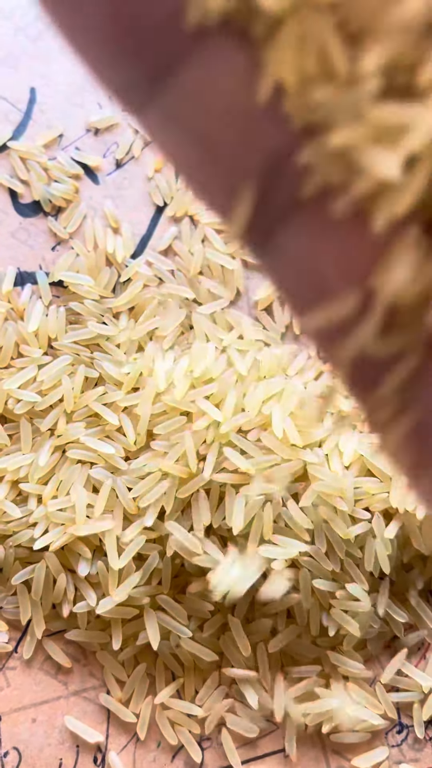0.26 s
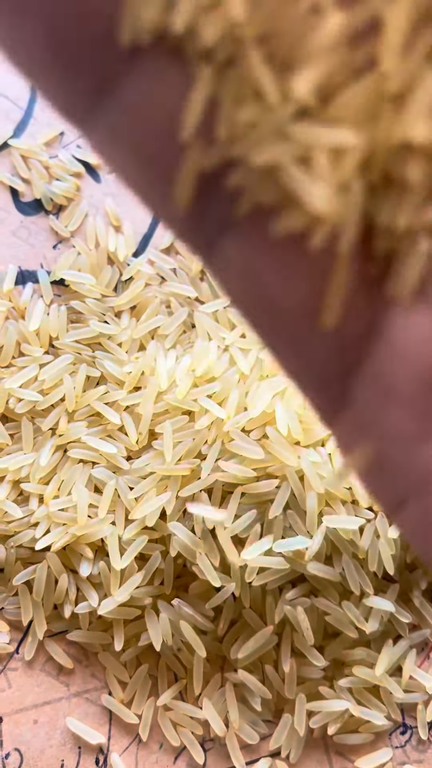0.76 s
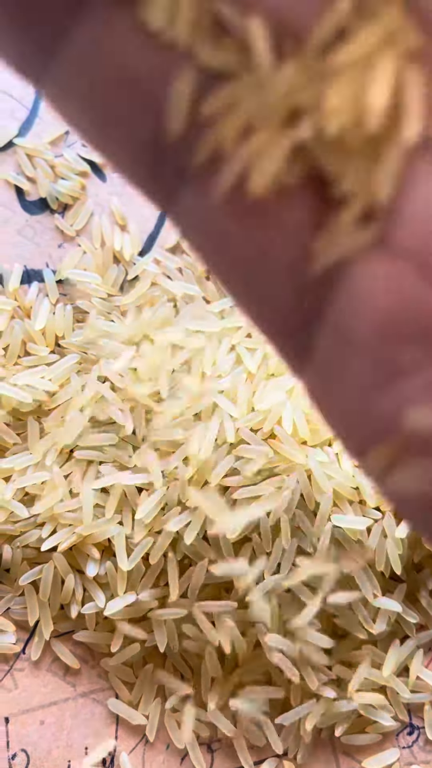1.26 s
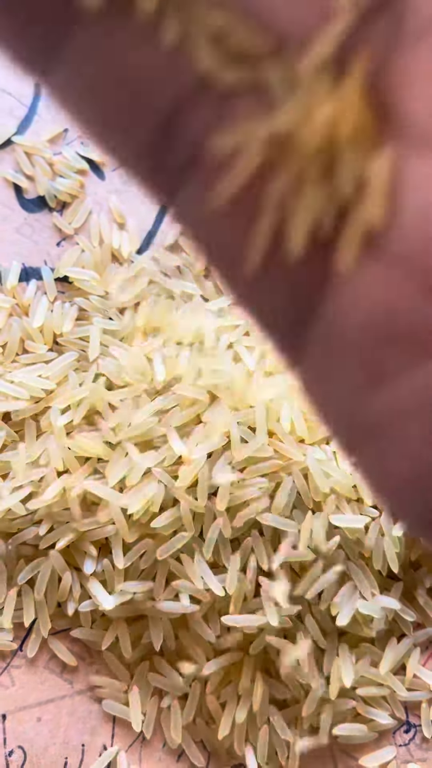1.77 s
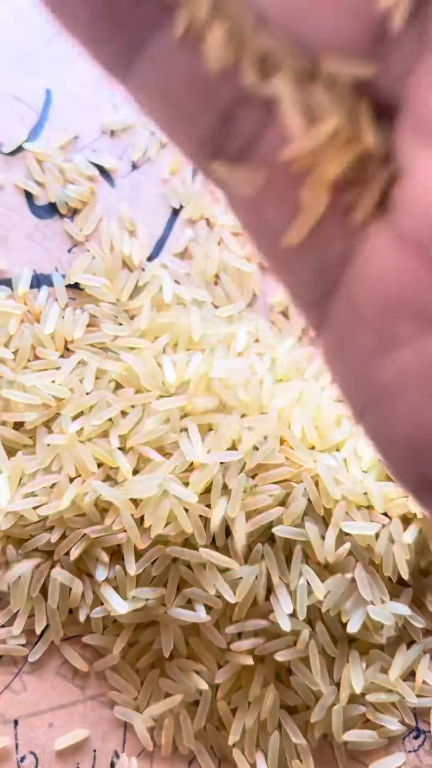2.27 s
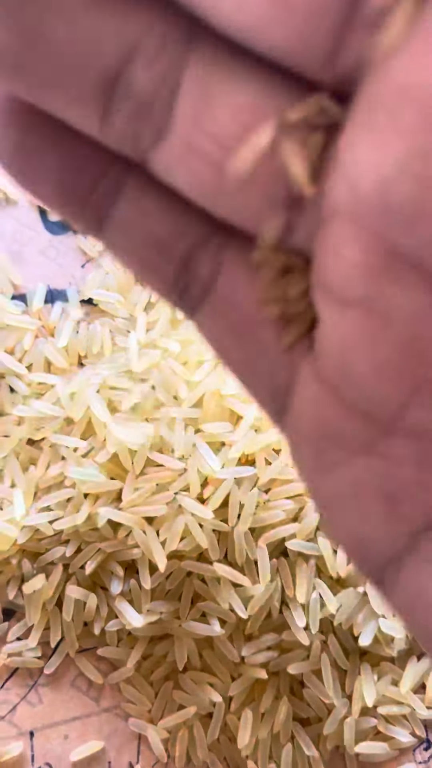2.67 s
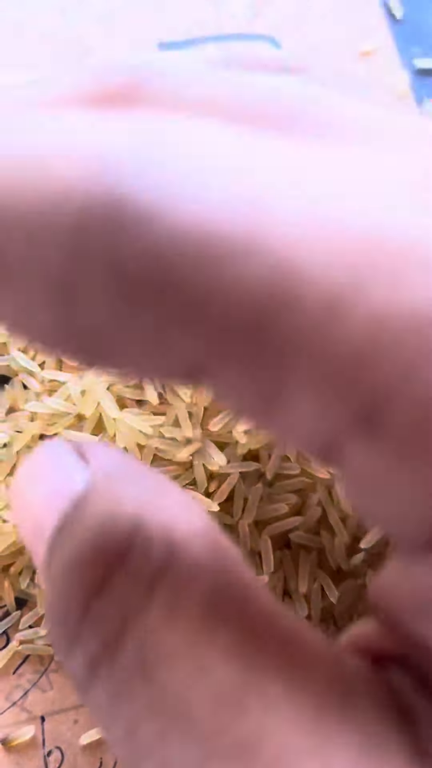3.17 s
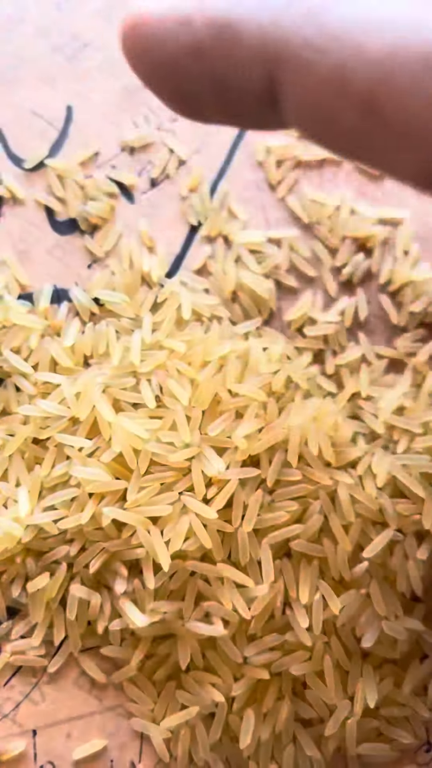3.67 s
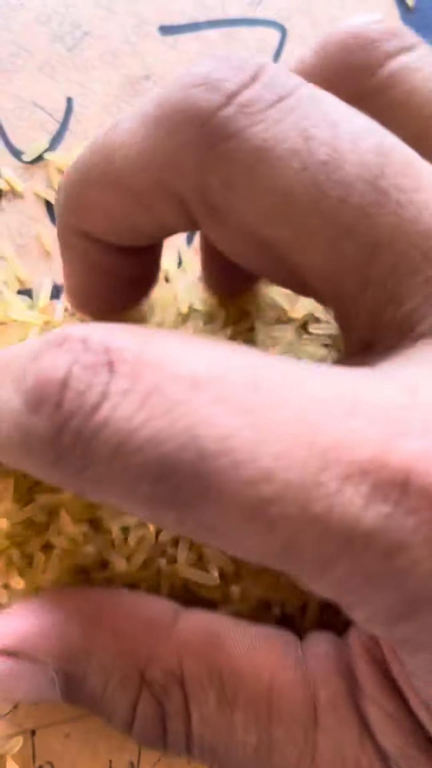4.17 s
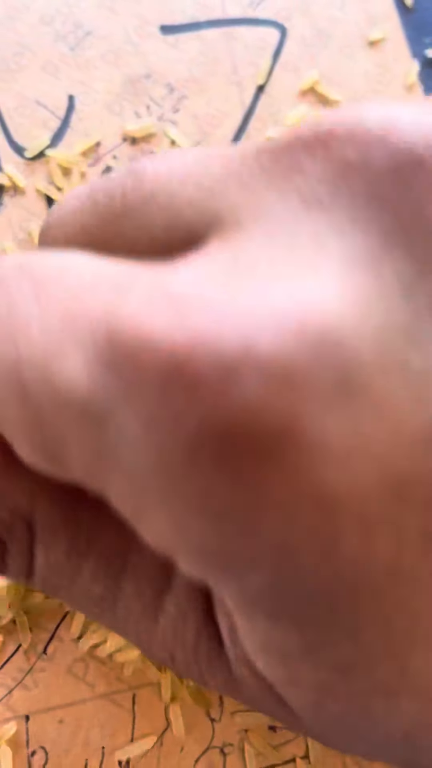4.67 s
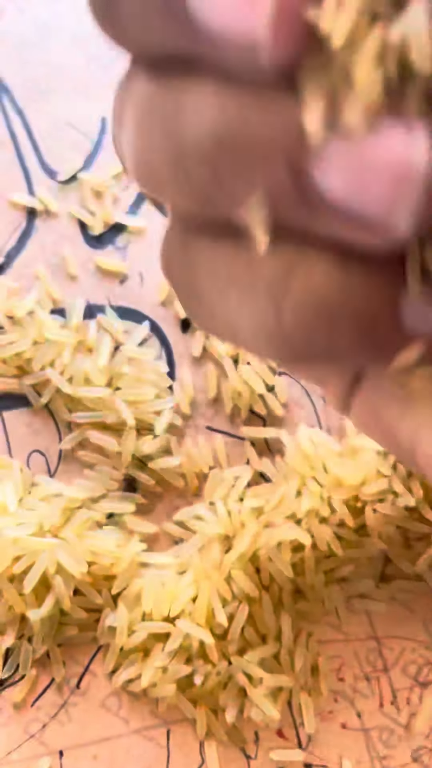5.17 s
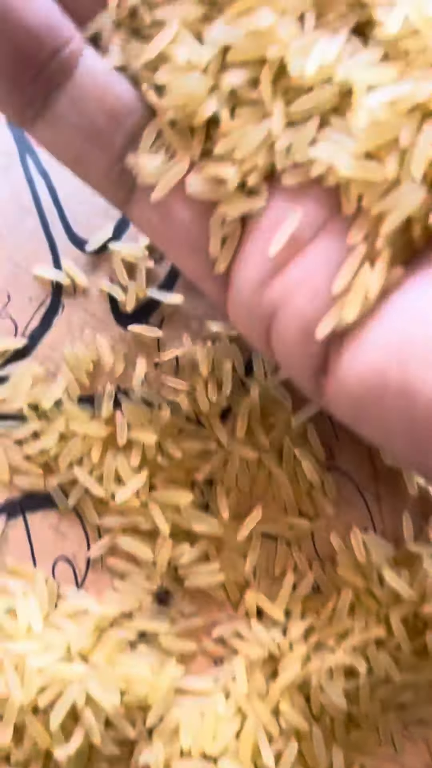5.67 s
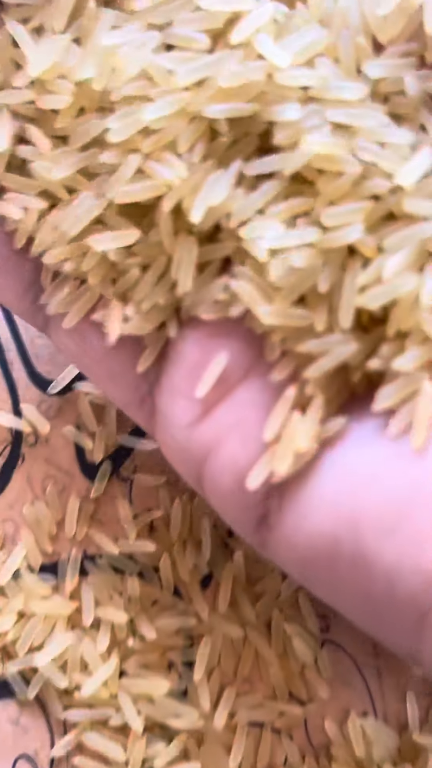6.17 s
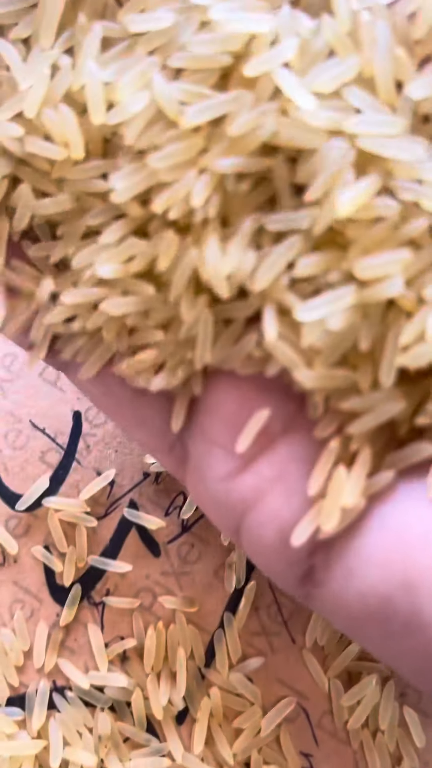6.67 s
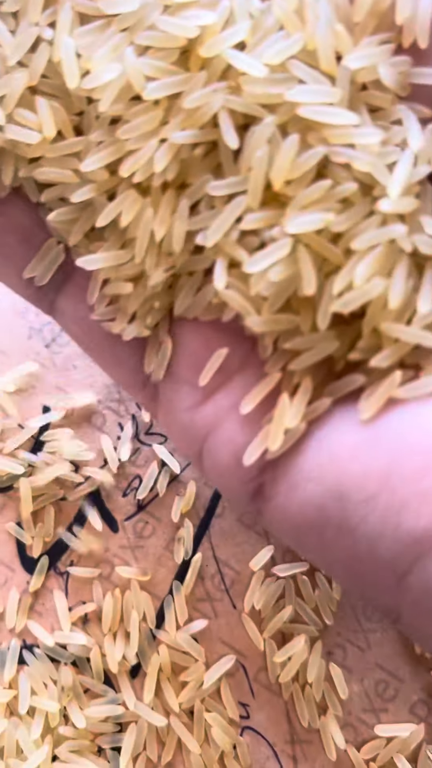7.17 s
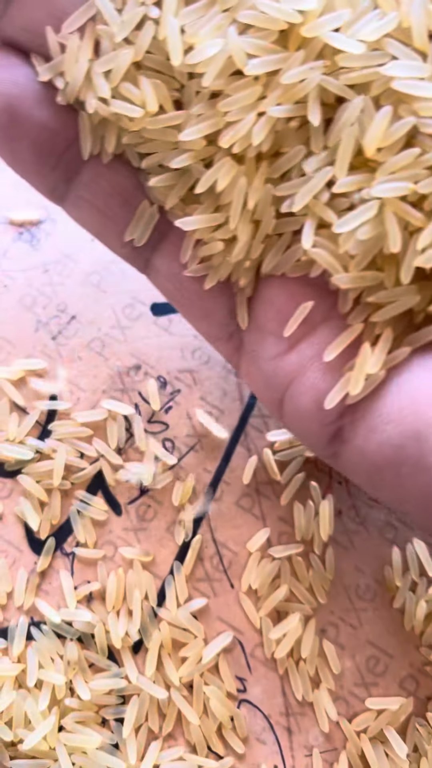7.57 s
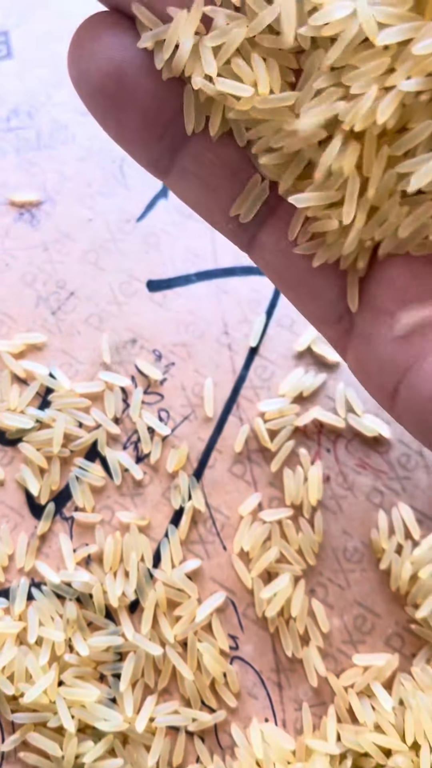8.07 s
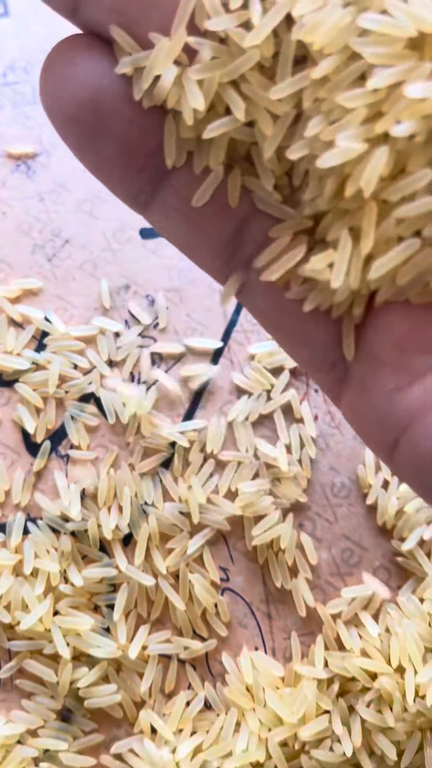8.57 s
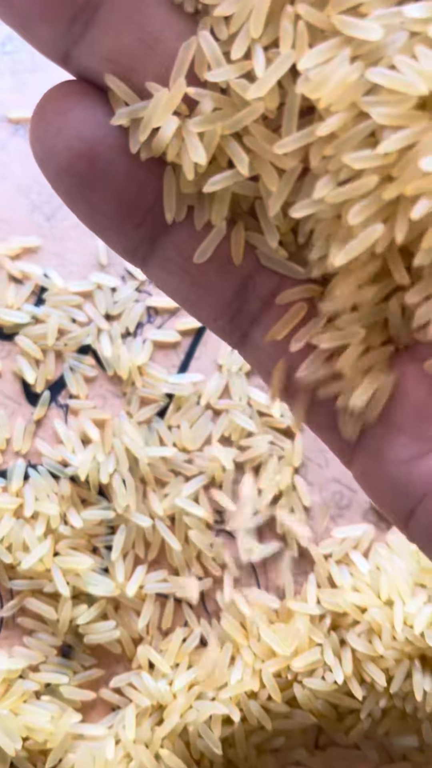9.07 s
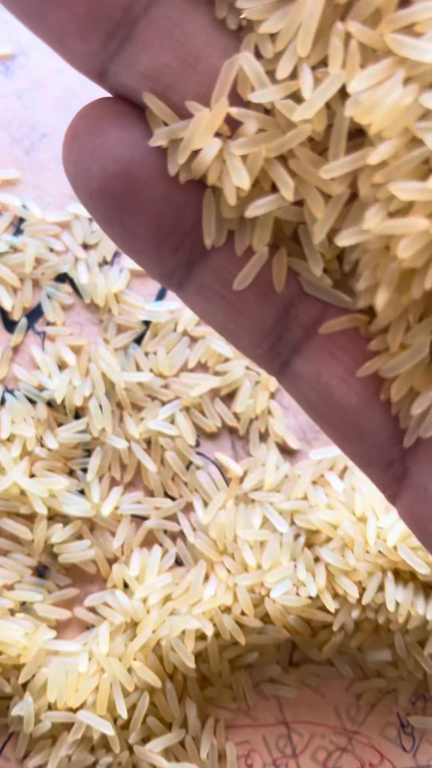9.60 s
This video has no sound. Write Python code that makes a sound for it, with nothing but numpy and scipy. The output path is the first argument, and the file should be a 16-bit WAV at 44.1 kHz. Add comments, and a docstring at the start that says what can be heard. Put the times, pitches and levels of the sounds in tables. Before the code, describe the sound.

Very close to the microphone, dry rice falls from a hand onto a heap on a thin board: sharp bright ticks with small dull knocks. The trickle thins, a hand scrapes the heap together in a dense gritty rush, then grains drop again in uneven bursts. Faint low engine throb and rumble lie behind, with a distant bird near the end.

```python
"""A thin board close to a two-port microphone: dry rice trickles from a hand onto a heap.
Each grain is a noise burst pair, a bright tick and a board knock; slides are showers of small ones.
Midway the hand scrapes the heap together: dense ticks, cupped knocks and a low band of drag noise.
Behind: two idling engines built from firing orders, one coming nearer, low rumble of noise and hums,
faint coloured air noise and a far bird of gliding whistles."""
import sys
import numpy as np
from scipy import signal
from scipy.fft import rfft, irfft, next_fast_len
from scipy.io import wavfile
from scipy.ndimage import uniform_filter1d

SR = 44100
rng = np.random.default_rng(int(sys.argv[2]) if len(sys.argv) > 2 else 0)


def generate_wav(signal):
    """Clip the signal to [-1, 1] and save it as 16-bit WAV at the path in sys.argv[1]."""
    frames = np.transpose(np.atleast_2d(signal))
    scaled = np.clip(frames, -1, 1) * 32767
    pcm = np.round(scaled).astype(np.int16)
    wavfile.write(sys.argv[1], SR, pcm)


N = 433944
TIME = np.arange(N) / SR
LEAD = 48  # samples an impact sound holds before its moment of contact
IN_STEP = [(0, 0), (1, 0)]  # no lag between the ports: (frequency [Hz], lag [rad])


def gain_of(db):
    """Decibels to an amplitude factor."""
    return 10 ** (np.asarray(db) / 20)


def evened(x):
    """Scales to rms 1."""
    return x / np.sqrt(np.mean(x ** 2) + 1e-20)


def wander(smooth):
    """A random curve of rms 1, smoothed over the given number of samples."""
    return evened(uniform_filter1d(rng.standard_normal(N), size=smooth))


def read(points, hz):
    """A spectrum table at the given frequencies, interpolated along log frequency."""
    f, value = np.transpose(points)
    return np.interp(np.log(hz + 1), np.log(f + 1), value)


def colour_gain(colour, size):
    """The factor of a colour table at every bin of a spectrum."""
    return gain_of(read(colour, np.fft.rfftfreq(size, 1 / SR)))


def played(rows):
    """Every column of a curve table at every sample."""
    s, *columns = np.transpose(rows)
    return [np.interp(TIME, s, column) for column in columns]


# right port over left: (frequency [Hz], level [dB])
RIGHT_LOUDER = [(150, 0), (300, 1.5), (900, 1.3), (1700, 0), (2900, 3), (3600, 0)]


def ports(a, b, alike, lag, size):
    """Two spectra become a left and a right port: the right is partly alike, late and a little louder."""
    hz = np.fft.rfftfreq(size, 1 / SR)
    same = np.clip(read(alike, hz), -1, 1)
    mixed = same * a + np.sqrt(1 - same ** 2) * b
    right = mixed * np.exp(-1j * np.interp(hz, *np.transpose(lag)))
    return irfft(np.array([a, right * colour_gain(RIGHT_LOUDER, size)]), size)


def noise(colour, alike, lag):
    """Steady coloured noise at both ports, rms 1."""
    size = next_fast_len(N)
    a, b = rfft(rng.standard_normal((2, size))) * colour_gain(colour, size)
    return evened(ports(a, b, alike, lag, size)[:, :N])


def fuzzy(hz, width):
    """Noise of rms 1 in a narrow resonance that follows hz; two equal poles, each width Hz wide."""
    pole = np.exp(-np.pi * width / SR)
    slow = [1, 1j] @ rng.standard_normal((2, N))
    for _ in range(2):
        slow = signal.lfilter([1], [1, -pole], slow)
    carrier = np.exp(2j * np.pi * np.cumsum(hz * np.ones(N)) / SR)
    return evened((slow * carrier).real)


def nook(x, t60):
    """A short, dull diffuse tail from the surfaces nearby."""
    t = np.arange(SR // 3) / SR
    dull = uniform_filter1d(rng.standard_normal(len(t)), size=3)
    tail = dull * gain_of(-60 * t / t60) * (t > .003)
    return signal.oaconvolve(x, tail[None] / np.linalg.norm(tail), axes=1)[:, :N]


# nearer engine, its firing cycle: (time [s], frequency [Hz])
CYCLE = [(0, 30.12), (4.8, 29.81), (7, 30.07), (9.84, 29.44)]
# its 2nd order, the deep throb: (time [s], level [dB])
THROB = [(0, -49), (.41, -45.5), (1.23, -48.5), (1.64, -55), (2.6, -42.5), (3.5, -51.5), (4.1, -48.5),
         (4.92, -40.5), (5.74, -47.5), (6.15, -40.5), (6.56, -44.5), (7.381, -43.5), (7.9, -51.5),
         (9.1, -40.5), (9.5, -47), (9.84, -49)]
# its 3rd order: (time [s], level [dB])
THIRD = [(0, -70), (1.2, -81), (3.7, -55), (4.3, -51), (5.1, -58), (5.74, -58), (6.2, -54), (7, -57),
         (7.8, -44.5), (8.5, -49), (9.2, -47.5), (9.84, -48)]
# its 5th order, rising as it comes nearer: (time [s], level [dB])
NEARING = [(0, -73), (1.6, -62.5), (3, -61), (5, -57), (7.4, -52.5), (9.1, -47.5), (9.84, -48)]
# its wavering upper orders: (multiple of the cycle, level relative to the 5th order [dB])
UPPER_ORDERS = [(6, -0.5), (7, -4.5), (11, -15)]
# far engine: (time [s], firing cycle [Hz], level [dB])
FAR_ENGINE = [(0, 28.49, -58.5), (2.5, 28.84, -54), (5, 28.7, -52), (6.5, 28.13, -55.5), (8, 27.63, -53),
              (9.84, 27.3, -46.5)]
# its orders: (multiple of the cycle, level relative to the far engine's curve [dB])
FAR_ORDERS = [(2, -1), (5, -1), (6, -12), (7, -12), (8, -14)]


def engines():
    """Orders are multiples of two firing cycles; the nearer one's upper and all far ones waver."""
    (hz,), (second_db,), (third_db,), (fifth_db,) = map(played, (CYCLE, THROB, THIRD, NEARING))
    turns = np.cumsum(hz) / SR
    near = np.zeros(N)
    for order, db in ((2, second_db), (3, third_db), (5, fifth_db)):
        near += gain_of(db) * np.sqrt(2) * np.sin(2 * np.pi * (order * turns + rng.random()))
    near += sum(gain_of(fifth_db + db) * fuzzy(order * hz, 2.2) for order, db in UPPER_ORDERS)
    far_hz, far_db = played(FAR_ENGINE)
    return near + sum(gain_of(far_db + db) * fuzzy(order * far_hz, 1.0) for order, db in FAR_ORDERS)


# swell of the low noise: (time [s], deep level [dB], upper level [dB])
RUMBLE = [(0, -49.5, -55), (2, -48.5, -56.5), (4, -56, -54.5), (6, -49, -51), (8, -51, -51.5),
          (9.84, -85, -50)]
# colour of the deep part: (frequency [Hz], relative level [dB])
DEEP = [(24, -4), (36, 2), (50, 19.5), (65, 24.5), (95, 7), (112, 11.5), (140, -54)]
# colour of the upper part: (frequency [Hz], relative level [dB])
UPPER = [(95, -5), (125, 5), (140, 10), (170, 1.5), (215, 5), (250, -6.5), (300, -74)]
# fuzzy steady hums: (frequency [Hz], width of each pole [Hz], level [dB])
DRONES = [(49.6, 9, -54), (94.1, 4.7, -56.5), (311, 6.7, -69.5)]


def rumble():
    """Low noise and steady hums from the surroundings, nearly alike at both ports."""
    deep_db, upper_db = played(RUMBLE)
    alike = [(60, .986), (150, .987), (300, .93)]  # (frequency [Hz], likeness [0-1])
    wash = gain_of(deep_db) * noise(DEEP, alike, IN_STEP)
    wash += gain_of(upper_db) * noise(UPPER, alike, IN_STEP)
    return wash + sum(gain_of(db) * fuzzy(hz, width) for hz, width, db in DRONES)


# colour of the air noise: (frequency [Hz], relative level [dB])
AIR = [(150, -4.5), (240, -0.5), (430, -7.5), (700, -14.5), (1200, -21), (1800, -27), (2250, -27),
       (2800, -31), (4500, -33), (7200, -35.5), (8400, -63), (9700, -58), (10800, -44), (12200, -68)]
# likeness of the ports for it: (frequency [Hz], likeness [-1 to 1])
AIR_ALIKE = [(200, 1), (350, 0.8), (700, 0.03), (1300, 0.22), (2400, 0.64), (4400, 0.094), (8000, 0.26)]
# its slow swell: (time [s], level [dB])
AIR_SWELL = [(0, -56), (2, -54), (3.7, -60), (6, -54.5), (8, -56), (9.84, -51)]


def air():
    """Faint coloured noise that swells slowly and wavers by about a decibel."""
    level_db = played(AIR_SWELL)[0] + 1.1 * wander(3000)
    return gain_of(level_db) * noise(AIR, AIR_ALIKE, IN_STEP)


# right port behind the left for near sound: (frequency [Hz], lag [rad])
NEAR_LAG = [(0, 0), (1800, 0), (2600, .3), (3100, .9), (4300, 1.1), (4850, 3.1), (5300, 5.4), (5900, 6.3),
            (9050, 9.4), (12200, 12.4), (13600, 13.3), (14500, 15), (15500, 15.6), (16600, 15.7)]
# likeness of the ports for near sound: (frequency [Hz], likeness [0-1])
NEAR_ALIKE = [(300, .9), (700, .8), (1700, .99), (2500, .93), (3500, .6), (5900, .93), (7100, .78),
              (9000, .97), (13000, .88), (14300, .55), (15700, .88)]
OWN_COLOUR_DB = 2  # no two impacts have quite the same colour


def strikes(colour, rise_ms, crack_ms, echo_ms, echo_db, tail_ms, tail_db, count=96, size=1024):
    """Many versions of one impact: a crack, its echo between board and housing, and a rattle."""
    def crack(ms):
        return np.exp(-np.maximum(ms / crack_ms, -ms / rise_ms))

    ms = (np.arange(size) - LEAD) / SR * 1000
    late = ms - echo_ms * rng.uniform(0.715, 1.33, (count, 1))
    echo = gain_of(echo_db + 0.71 * rng.standard_normal((count, 1))) * crack(late)
    rattle = gain_of(tail_db) * np.exp(-abs(ms) / tail_ms) * (ms > 0)
    shape = crack(ms) + echo + rattle
    own = uniform_filter1d(rng.standard_normal((count, size // 2 + 1)), size=28)
    own_gain = gain_of(OWN_COLOUR_DB * evened(own))
    cepstrum = irfft(np.log(colour_gain(colour, size) * own_gain))
    cepstrum[:, 1:size // 2] *= 2  # folding makes the colour causal
    cepstrum[:, size // 2 + 1:] = 0
    burst = rfft(shape * rng.standard_normal((2, count, size)))
    # every blow covers all pitches evenly before it is coloured
    flat = burst / np.sqrt(uniform_filter1d(abs(burst) ** 2, size=30))
    a, b = flat * np.exp(rfft(cepstrum))
    return ports(a, b, NEAR_ALIKE, NEAR_LAG, size).transpose(1, 0, 2)


# grain on grain, lifted by the microphone port's resonance: (frequency [Hz], relative level [dB])
TICK = [(1500, -23.5), (3000, -33), (4700, -11.5), (5400, -6), (6200, -5.5), (7000, -4.5), (8300, -3.5),
        (10300, 6), (11500, -2.5), (12600, -14), (14000, -21.5), (15600, -22), (16600, -50.5)]


def grain_ticks():
    """Hard grains meet in a very short, bright crack with little rattle."""
    return strikes(TICK, rise_ms=0.28, crack_ms=0.16, echo_ms=1.173, echo_db=-8, tail_ms=3.6, tail_db=-28)


# the board's colour: (frequency [Hz], relative level [dB])
KNOCK = [(250, -13.5), (600, -3), (1250, -4.5), (1680, 0), (2300, -5), (3100, -5), (3700, -10),
         (4300, -6.5), (7000, -38.5)]


def board_knocks():
    """The thin board answers a grain with a lower, slightly longer crack."""
    return strikes(KNOCK, rise_ms=0.26, crack_ms=0.26, echo_ms=1.35, echo_db=-7.5,
                   tail_ms=3.6, tail_db=-21.5)


def scatter(sounds, s, sizes):
    """Drops a random version of the impact at each moment."""
    length = sounds.shape[2]
    out = np.zeros((2, N + 2 * length))
    picks = (rng.random(len(s)) * len(sounds)).astype(int)
    for at, size, pick in zip((s * SR).astype(int), sizes, picks):
        out[:, at:at + length] += size * sounds[pick]
    return out[:, LEAD:N + LEAD]


# colour of the showers' ticks, falling off at the top: (frequency [Hz], relative level [dB])
SHOWER_COLOUR = [(3500, 20), (6200, 17.5), (9000, 14), (11500, 15.5), (13000, 13), (16000, -5)]


def shower(levels, span, ticks, knocks, per_s, spread_db, clump_db):
    """Chance impacts of uneven, bunched strength, at the given tick and knock levels."""
    chance, luck = rng.random(N), rng.exponential(1, N)
    smooth = uniform_filter1d(uniform_filter1d(rng.standard_normal(N), 200), 200)
    clumps = gain_of(clump_db * evened(smooth))
    inside = (TIME > span[0]) & (TIME < span[1])
    at = inside & (chance < per_s / SR)
    sizes = clumps[at] * gain_of(spread_db * np.minimum(luck[at], 3.5))
    size = ticks.shape[2]
    coloured = irfft(rfft(ticks) * colour_gain(SHOWER_COLOUR, size), size)
    out = np.zeros((2, N))
    for level, sounds in zip(levels, (coloured, knocks)):
        equal = sounds / np.linalg.norm(sounds, axis=(1, 2), keepdims=True)
        patter = scatter(equal, TIME[at], sizes)
        out += level * patter / np.std(patter.mean(0)[inside])
    return out


# little slides of small grains leaving the hand:
# (time [s], length [s], tick level [dB], knock level relative to the ticks [dB])
SLIDES = [(0.005, 0.13, -57, 0), (0.2, 0.03, -59.5, -0.5), (0.285, 0.15, -53.5, -5),
          (0.497, 0.15, -60.5, -1.5), (0.953, 0.11, -56.5, -3.5), (1.138, 0.076, -49.5, -3.5),
          (1.371, 0.36, -53, -3.5), (1.755, 0.069, -66, 1), (1.904, 0.089, -61.5, 2.5),
          (2.21, 0.11, -63.5, 0), (2.45, 0.018, -50, 0), (2.593, 0.12, -64.5, -0.5),
          (2.997, 0.09, -57.5, -3.5), (4.657, 0.054, -62.5, -8), (4.815, 0.13, -73.5, 7),
          (4.923, 0.39, -61, -2.5), (5.487, 0.06, -47, -1.5), (5.59, 0.06, -60, 3), (5.94, 0.13, -62, 0),
          (6.366, 0.1, -66.5, 2), (6.783, 0.012, -58, 0.5), (6.857, 0.03, -63, 9), (6.911, 0.038, -50.5, 2),
          (7.08, 0.051, -77, 13.5), (7.236, 0.066, -82, 12), (8.16, 0.041, -69, 2),
          (8.275, 0.017, -49.5, -1.5), (8.35, 0.063, -57, 4.5), (8.504, 0.11, -71, 5.5),
          (8.883, 0.055, -66.5, 10), (9.258, 0.066, -65, 6.5)]
SWELL_DB_PER_S, SETTLE_DB_PER_S = 420, 122  # how fast a slide comes and dies away
REST_TICKS_DB, REST_KNOCKS_DB = -88.5, -77.5  # the heap creeps faintly between slides


def slides(ticks, knocks):
    """A patter of small impacts in which each slide swells, holds and settles."""
    start, length, tick_db, knock_db = np.transpose(SLIDES)[:, :, None]
    t = np.arange(0, N + 64, 64) / SR
    before, after = np.maximum(start - t, 0), np.maximum(t - start - length, 0)
    away_db = SWELL_DB_PER_S * before + SETTLE_DB_PER_S * after
    levels = []
    for db, rest_db in ((tick_db, REST_TICKS_DB), (tick_db + knock_db, REST_KNOCKS_DB)):
        power = (gain_of(db - away_db) ** 2).sum(0) + gain_of(rest_db) ** 2
        levels.append(np.interp(TIME, t, np.sqrt(power)))
    return shower(levels, (0, N / SR), ticks, knocks, per_s=520, spread_db=2.0, clump_db=1.5)


# single grains landing: (time [s], tick peak level [dB], knock peak level relative to the tick [dB])
GRAINS = [(0.029, -38, -13), (0.038, -23, -21.0), (0.054, -23.5, -13.5), (0.098, -27.5, -9.5),
          (0.127, -26, -26.0), (0.1318, -26.5, -13), (0.1447, -36, -16), (0.1583, -28, -19),
          (0.212, -30.5, -12), (0.234, -30.5, -18), (0.272, -25.5, -10), (0.2943, -29, -21.0),
          (0.303, -27, -4), (0.3313, -25, -19), (0.3468, -24, -14), (0.419, -28.5, -30), (0.453, -31, -22),
          (0.534, -36, -19.0), (0.5576, -33, -21), (0.5767, -19.5, -18), (0.6, -45, -28),
          (0.6113, -30, -10), (0.6448, -30.5, -16), (0.654, -26.5, -20), (0.8394, -35.5, -15),
          (0.8954, -32, -12), (0.9175, -29.5, -13), (0.9324, -29, -11), (0.9773, -31.5, -8.5),
          (1.0174, -33.5, -5), (1.0461, -31, -6.5), (1.096, -25.5, -7), (1.113, -33, -19.0),
          (1.1253, -31, -18), (1.131, -26, -16), (1.279, -31.5, -9.5), (1.3164, -29.5, -9),
          (1.3663, -32, -5.5), (1.3744, -23.0, -24.0), (1.411, -32, -14), (1.431, -29.5, -14),
          (1.454, -34, -3), (1.5914, -33, -13), (1.6348, -26, -13), (1.6463, -31.5, -3), (1.6908, -31, -11),
          (1.6968, -18, -20), (1.7032, -22, -20), (1.7422, -26, -17), (1.756, -30.5, -7.5),
          (1.7747, -31, -13), (1.815, -41, 2), (1.844, -34.5, -4), (1.893, -33, -10), (1.908, -30, -7),
          (1.9347, -23, -17), (1.9526, -32, -17), (1.958, -28, -7.5), (1.9707, -21, -14.0),
          (1.9792, -25, -15), (1.9902, -26.5, -9), (2.027, -24, -19), (2.039, -30, -7.5),
          (2.0572, -29, -15), (2.066, -23.5, -28), (2.1725, -32.5, -3.5), (2.2169, -32.5, -2.5),
          (2.2714, -19.5, -16.5), (2.3142, -34, -8), (2.3713, -34, -10), (2.422, -28.5, -6.5),
          (2.463, -26, -10.5), (2.4745, -27, -6.5), (2.5223, -18.5, -15.5), (2.539, -28, -15),
          (2.6065, -39, -18), (2.746, -36, -7.5), (2.769, -40.5, -5), (2.8158, -40, -3.5),
          (2.8463, -37.0, -10), (2.9528, -38.5, -7), (3.006, -33, -6), (3.033, -38, -18),
          (3.0402, -30, -10), (3.1373, -33, -5.5), (3.1489, -34.5, 4), (3.1683, -32, -6), (3.1812, -42, -1),
          (3.2068, -39, -16), (3.2377, -31, -5.5), (3.267, -30, -4.5), (3.2975, -33, -9),
          (3.3281, -27.5, -12), (3.919, -41.5, 8.5), (3.9526, -18.0, -26), (4.469, -28, -20),
          (4.707, -33, -4), (5.0354, -23, -15.5), (5.0425, -18, -17), (5.1285, -28.5, 2),
          (5.1573, -23.5, -19), (5.1975, -40, -12), (5.228, -25, -14), (5.2648, -33, 0),
          (5.27, -24.5, -7.5), (5.2993, -29, -2), (5.3279, -19.5, -10.5), (5.3325, -31, -6.5),
          (5.3616, -29, -11), (5.4, -29, -6), (5.422, -22, -9), (5.428, -20.5, -9.5), (5.4348, -28.5, 1.5),
          (5.448, -20, -9), (5.4693, -23.5, -11), (5.4793, -28, -6), (5.4993, -20.5, -12),
          (5.513, -13, -33), (5.524, -33, -12), (5.5333, -36, -15), (5.546, -18, -12), (5.563, -28, -17),
          (5.5754, -36, -11), (5.6077, -22.5, -22), (5.614, -26, -21), (5.625, -33, -6), (5.635, -25.5, -7),
          (5.6532, -28, -7), (5.6687, -24, -26), (5.728, -23.5, -20.5), (5.812, -24, -13),
          (5.817, -24, -16.5), (5.8642, -36.5, -8), (5.8877, -21.5, -12), (5.898, -33.5, -8),
          (5.9595, -32, -7), (6.0062, -32, 4), (6.014, -32.5, -7.0), (6.0843, -33.5, -3),
          (6.0968, -30, -6.5), (6.295, -24.5, -3.5), (6.3612, -32, -3), (6.3647, -29.5, -1.5),
          (6.3835, -39, 4.5), (6.4256, -30.5, -6), (6.4318, -35, -3), (6.7212, -24.5, -5.5),
          (6.7304, -24, -9), (6.7385, -39, 0.0), (6.7437, -29, -5), (6.7627, -20.5, -6.5), (6.777, -26, -9),
          (6.7811, -21.5, -6.5), (6.7928, -25.5, -6), (6.8083, -38, -12), (6.8361, -18.5, -7.5),
          (6.8463, -37, -4), (6.8572, -31.5, -3), (6.8668, -24, -3.5), (6.8706, -27.5, -16),
          (6.904, -32.5, 1), (6.9137, -27, -6.5), (6.9317, -27, -5), (6.9402, -26, -12.0),
          (6.9516, -24, -13), (6.9605, -35, -4), (6.9784, -23, -19), (6.9882, -21.5, -17.0),
          (6.9917, -26, -12), (6.9959, -32, -12), (7.012, -32, -3), (7.019, -25, -15), (7.0488, -24.5, -9),
          (7.0754, -28, -7), (7.0798, -19.5, -8.5), (7.087, -37, -4), (7.1002, -24, -10), (7.106, -38, 3.5),
          (7.1256, -29, -7), (7.1306, -19, -28), (7.1343, -29, -1.5), (7.1766, -20, -8),
          (7.2053, -21, -19.5), (7.2595, -27.5, -15), (7.2637, -34, -17), (7.2694, -42, 4),
          (7.2862, -35, -7.5), (7.29, -41, -18), (7.293, -34, -1), (7.316, -26, -5.5), (7.354, -26.5, -8.5),
          (7.3801, -18.5, -26), (7.3857, -34, -19), (7.4054, -34, -10), (7.428, -44, -9),
          (7.4366, -26.5, -5.5), (7.496, -25.5, -4), (7.5024, -33, -2), (7.5084, -32, -1.5),
          (7.566, -36, -5), (7.7345, -24, -11), (7.7439, -36, -10), (7.8003, -37, -5.5),
          (7.8488, -34.5, -20), (8.089, -25, -2), (8.1651, -28, -7), (8.169, -27, 0), (8.188, -36.5, -3),
          (8.251, -16.5, -10.5), (8.266, -28.5, -2.5), (8.272, -14, -19), (8.2878, -26, -1.5),
          (8.2993, -18, -14), (8.3108, -23, -5), (8.3136, -18, -12), (8.3242, -30, -6), (8.335, -21, -11),
          (8.337, -16.5, -18), (8.344, -24.5, -4.5), (8.3637, -18, -11), (8.3735, -20, -7.5),
          (8.3793, -18, -22), (8.4084, -34, -8), (8.4144, -21.5, -11), (8.4197, -23.5, -7),
          (8.438, -20, -7), (8.455, -22, -10), (8.49, -41, -9), (8.4942, -13.5, -28), (8.4992, -14.5, -20),
          (8.5067, -29, -22), (8.5145, -29, -9), (8.5497, -30.5, -4), (8.556, -30, -4), (8.608, -38, -10),
          (8.6223, -18, -13), (8.7977, -31.5, 0.5), (8.8056, -29.5, -5), (8.8153, -28.5, -5),
          (8.842, -37, -4), (8.8834, -40, 4), (8.8962, -27, -11), (8.901, -28, -21), (8.9315, -17, -12.5),
          (8.9519, -23.5, -8), (8.992, -19.5, -7.5), (9, -17.5, -12), (9.0078, -24, -5), (9.014, -27, -9),
          (9.024, -32, -6), (9.0371, -21, -11.5), (9.046, -28, -10), (9.0555, -42, -8), (9.0636, -20.5, -8),
          (9.0795, -23, -4.5), (9.0883, -26, -4.5), (9.1267, -16.5, -14.5), (9.168, -17.5, -9),
          (9.1742, -21.5, -10), (9.1922, -26, -12), (9.205, -32, -2.5), (9.2437, -29.5, -12),
          (9.269, -25, -13), (9.3146, -41, -12), (9.3566, -33.5, -5), (9.3903, -26.5, -9),
          (9.41, -29.5, -3), (9.425, -31.5, -2), (9.4382, -27.5, -8), (9.449, -34, -3),
          (9.476, -23.5, -10.5), (9.4793, -25.5, -7)]
REBOUND_S = (.003, .022)  # earliest and latest, after landing
REBOUND_DB, REBOUND_SPREAD_DB = -17, 5  # loudest possible rebound, scatter below it


def single_grains(ticks, knocks):
    """The grains that stand out: a tick and a knock each, then two weak rebounds."""
    def peaked(sounds):
        return sounds / abs(sounds).max(2).mean(1)[:, None, None]

    s, tick_db, knock_db = np.transpose(GRAINS)
    later = rng.uniform(*REBOUND_S, (2, len(s)))
    rebound_db = REBOUND_DB - REBOUND_SPREAD_DB * abs(rng.standard_normal((2, len(s))))
    s = np.concatenate([s, *(s + later)])
    tick_db = np.concatenate([tick_db, *(tick_db + rebound_db)])
    knock_db = tick_db + np.resize(knock_db, len(s))
    return scatter(peaked(ticks), s, gain_of(tick_db)) + scatter(peaked(knocks), s, gain_of(knock_db))


# grains that ring in the hollow of the hand:
# (time [s], frequency [Hz], level before the soft onset [dB], t60 [s])
RINGS = [(2.634, 4580, -38, 0.0089), (2.713, 3800, -38, 0.0096), (2.723, 2310, -38, 0.012),
         (3.0053, 1780, -28, 0.014)]


def rings():
    """Short dying tones of the hollow, each with a soft onset."""
    out, t = np.zeros(N), np.arange(2048) / SR
    onset = 1 - np.exp(-t / 0.00044)
    for s, hz, db, t60 in RINGS:
        tone = gain_of(db - 60 * t / t60) * np.sin(2 * np.pi * hz * t)
        out[round(s * SR):][:len(t)] += tone * onset
    return out


# skin rubs on skin or board: (time [s], length [s], start frequency [Hz], end frequency [Hz],
# width of each pole [Hz], level at mid-rub before the unevenness [dB])
RUBS = [(3.118, 0.43, 2414, 2030, 750, -68), (3.3, 0.2, 6270, 5800, 1500, -74.5),
        (4.065, 0.086, 594, 1500, 450, -44), (4.608, 0.543, 1734, 1706, 400, -66.5),
        (6.0, 0.49, 2320, 2185, 700, -70), (7.572, 0.12, 6300, 5700, 1500, -70)]


def rubs():
    """Soft, uneven bands of noise that drift while the hand slides."""
    out, catch = np.zeros(N), wander(600)
    for s, length, start_hz, end_hz, width, db in RUBS:
        along = np.clip((TIME - s) / length, 0, 1)
        band = fuzzy(start_hz + (end_hz - start_hz) * along, width)
        out += gain_of(db + 3.0 * catch) * np.sin(np.pi * along) * band
    return out


# knocks under the cupped hand: (frequency [Hz], relative level [dB])
CUPPED = [(500, -31), (1100, -9.5), (1650, 5.5), (1950, -1.5), (2400, -10), (3200, -3), (4300, -10.5),
          (7000, -41)]


def cupped_knocks():
    """Under the cupped hand a knock has a narrow colour and a long, strong rattle."""
    return strikes(CUPPED, rise_ms=0.18, crack_ms=0.35, echo_ms=1.37, echo_db=-21,
                   tail_ms=13.0, tail_db=-2.0)


# the hand sweeps the heap: (time [s], tick level [dB], knock level [dB], board scrape level [dB])
SWEEP = [(3.8, -97, -101, -80), (3.866, -56.5, -64, -76), (3.89, -54, -56.5, -53), (3.905, -55, -58, -59),
         (3.925, -50, -56, -43), (3.96, -42.5, -49.5, -56), (3.986, -47, -53, -51.5),
         (4.035, -39.5, -44.5, -50.5), (4.085, -46, -46.5, -46), (4.16, -44.5, -42, -48),
         (4.19, -44.5, -44, -43.5), (4.25, -50, -43, -45), (4.3, -48.5, -41.5, -41.5),
         (4.45, -52, -46, -47.5), (4.55, -54.5, -49.5, -50.5), (4.7, -64, -57, -62), (4.8, -89, -65, -77)]
# colour of the board scrape: (frequency [Hz], relative level [dB])
SCRAPE = [(200, -42), (300, 4.5), (480, 10), (620, 5.5), (900, 5), (1300, -0.5), (2200, -18), (4000, -74)]


def sweep(ticks, cupped):
    """The heap drags over the board: juddering noise under a dense shower of ticks and cupped knocks."""
    tick_db, knock_db, scrape_db = played(SWEEP)
    start, end = SWEEP[0][0], SWEEP[-1][0]
    grains = shower(gain_of([tick_db, knock_db]), (start, end), ticks, cupped,
                    per_s=1400, spread_db=0.7, clump_db=0.1)
    touching = (TIME > start) & (TIME < end)
    drag = touching * gain_of(scrape_db + 1.8 * wander(300))
    return grains + drag * noise(SCRAPE, NEAR_ALIKE, NEAR_LAG)


# far bird: (time [s], length [s], start frequency [Hz], end frequency [Hz],
# level before roughness and smearing [dB])
CHIRPS = [(7.61, .12, 5600, 5200, -67), (8.74, .09, 2800, 3000, -66), (9.592, .012, 6700, 5400, -68),
          (9.61, .05, 5750, 5400, -63)]


def bird():
    """Thin gliding whistles, rough and smeared by distance."""
    out = np.zeros(N)
    for s, length, start_hz, end_hz, db in CHIRPS:
        hz = np.linspace(start_hz, end_hz, round(length * SR))
        note = gain_of(db) * np.sin(2 * np.pi * np.cumsum(hz) / SR) * np.hanning(len(hz))
        out[round(s * SR):][:len(note)] += note
    out *= wander(160)
    return .8 * out + .7 * nook(np.array([out, out]), .3)


def scene():
    """Rice under the hand, its short tail, and the surroundings."""
    behind = engines() + rumble() + air()
    ticks, knocks = grain_ticks(), board_knocks()
    rice = slides(ticks, knocks) + single_grains(ticks, knocks)
    rice += rings() + rubs() + sweep(ticks, cupped_knocks())
    tail = gain_of(-21) * nook(rice, 0.3)
    return rice + tail + behind + bird()


def record(dry):
    """The band limit of the recorder: a steep low-pass takes off the top of the treble."""
    low_pass = signal.firwin(511, 16750, window=("kaiser", 9), fs=SR)  # edge in Hz
    return signal.oaconvolve(dry, low_pass[None], "same")


dry = scene()
out = record(dry)
generate_wav(out)
```